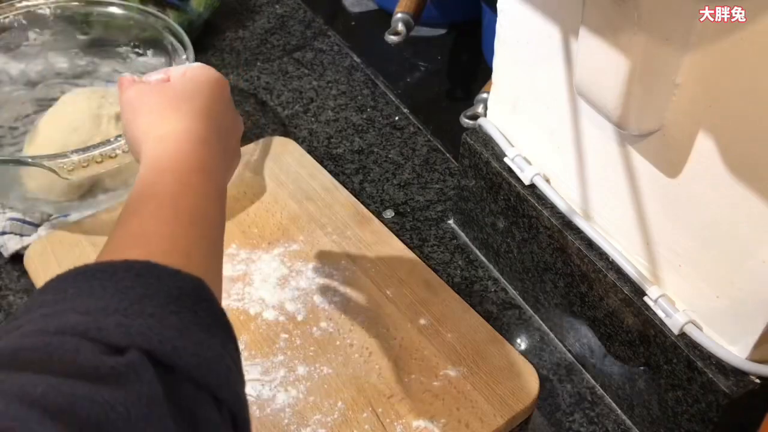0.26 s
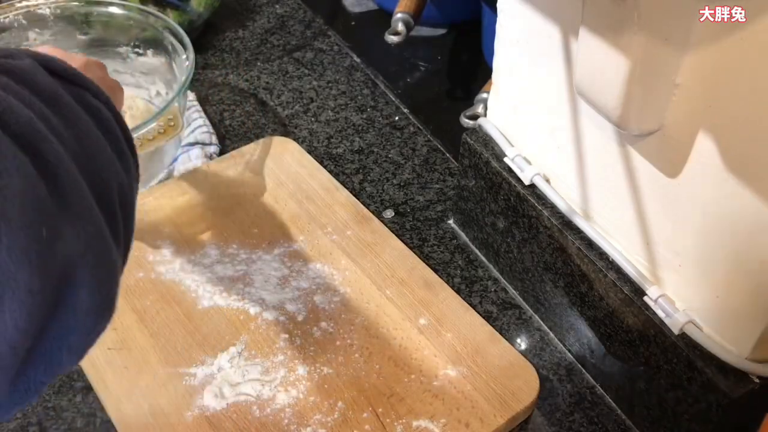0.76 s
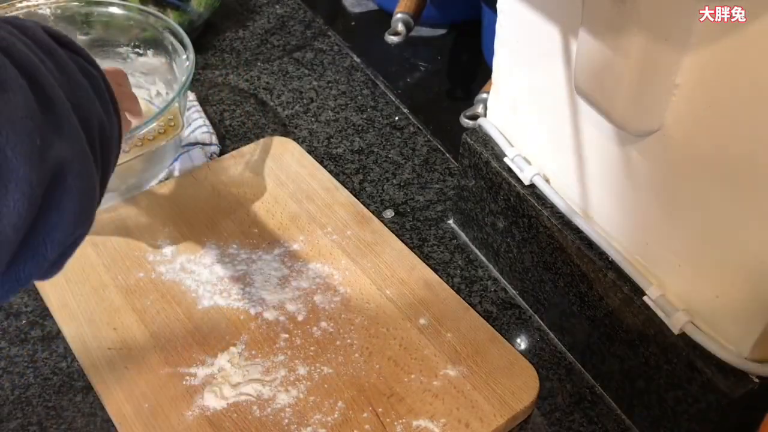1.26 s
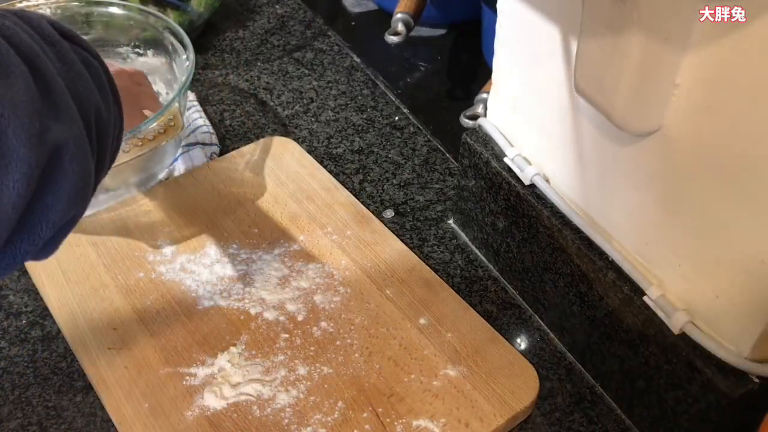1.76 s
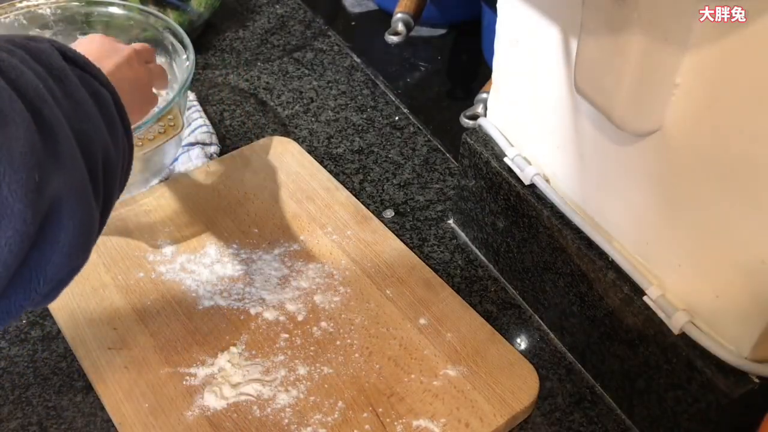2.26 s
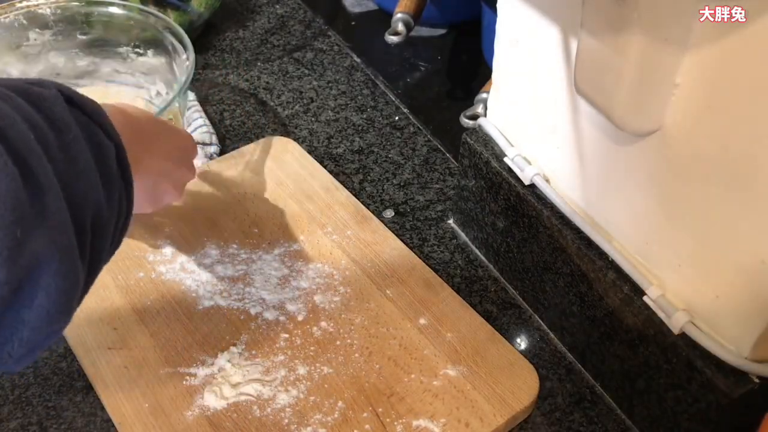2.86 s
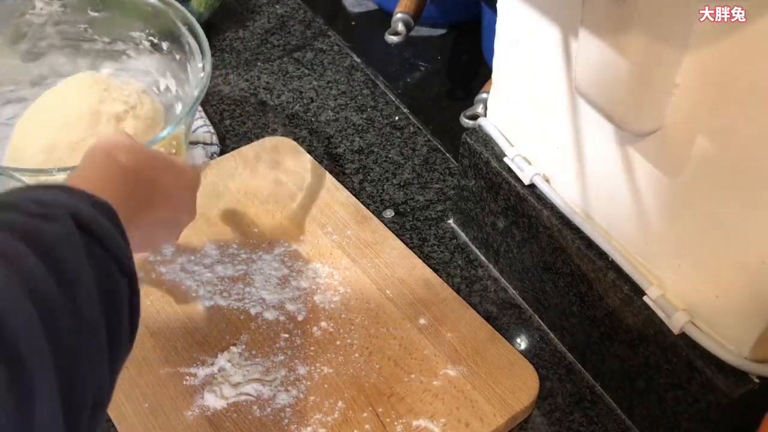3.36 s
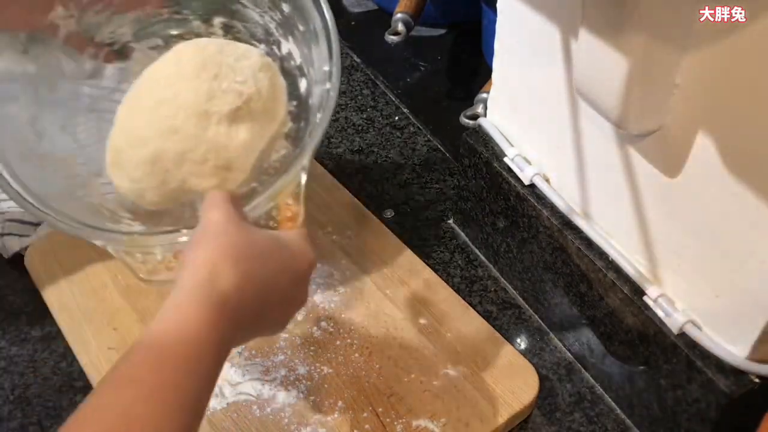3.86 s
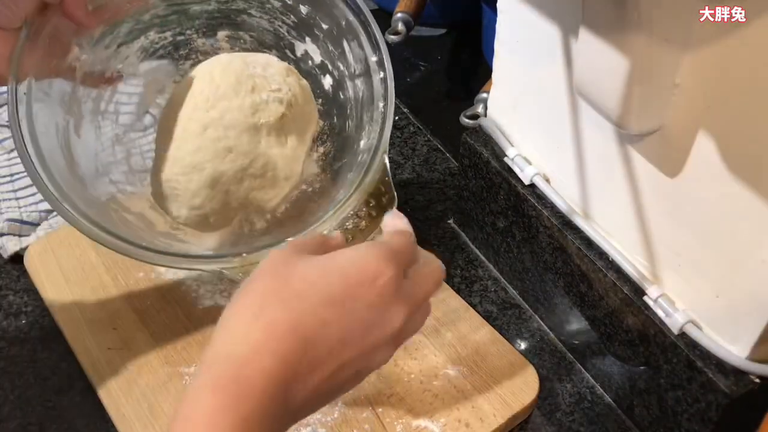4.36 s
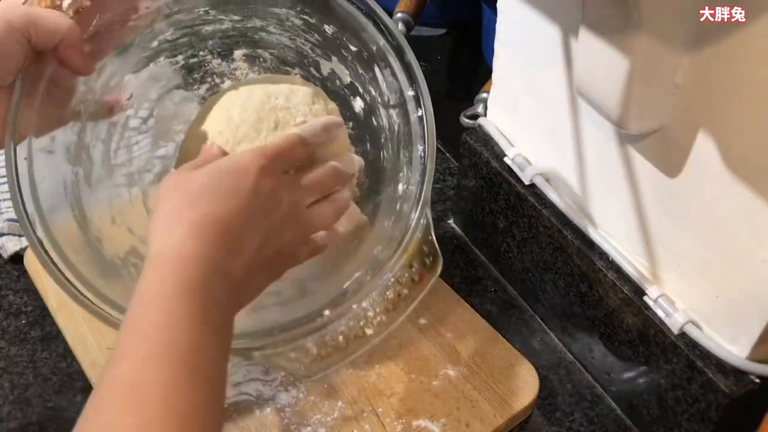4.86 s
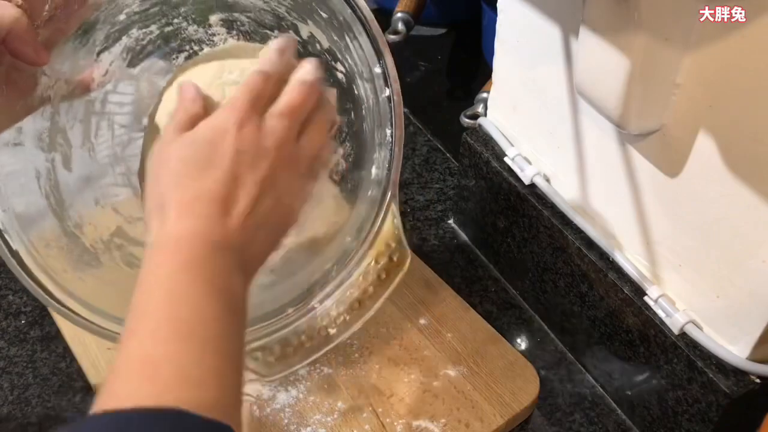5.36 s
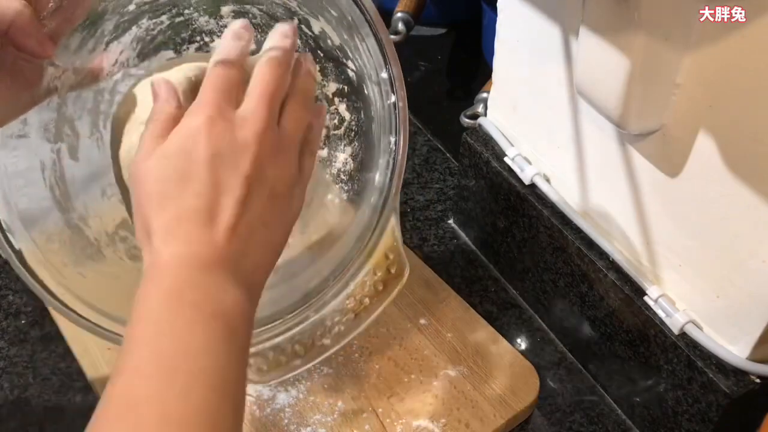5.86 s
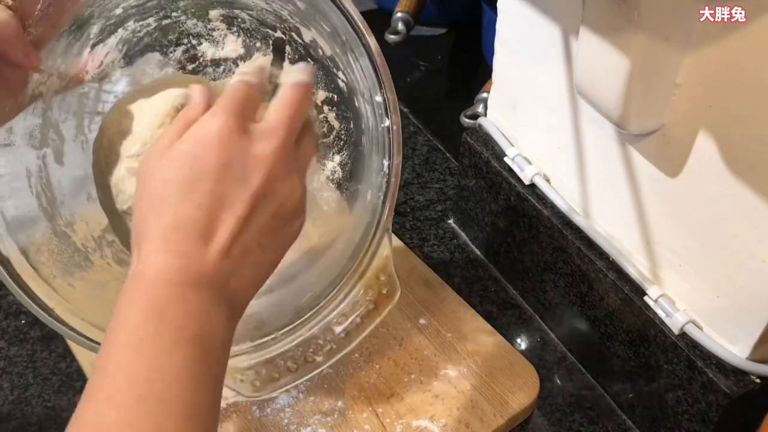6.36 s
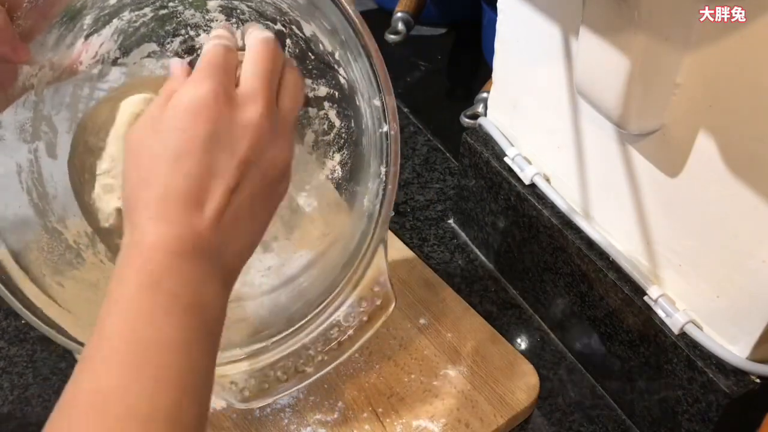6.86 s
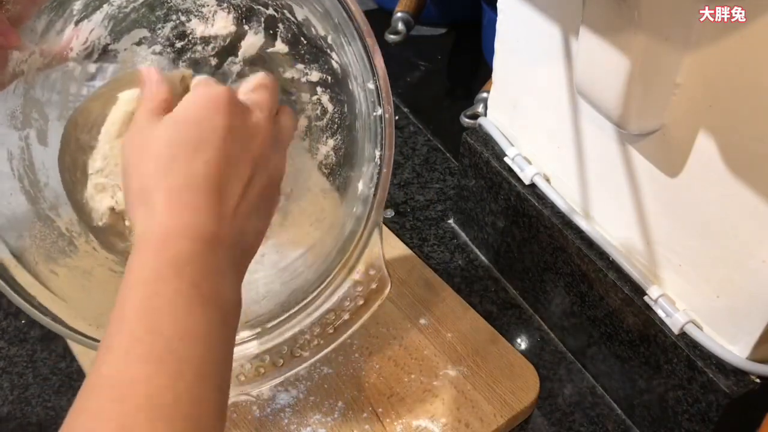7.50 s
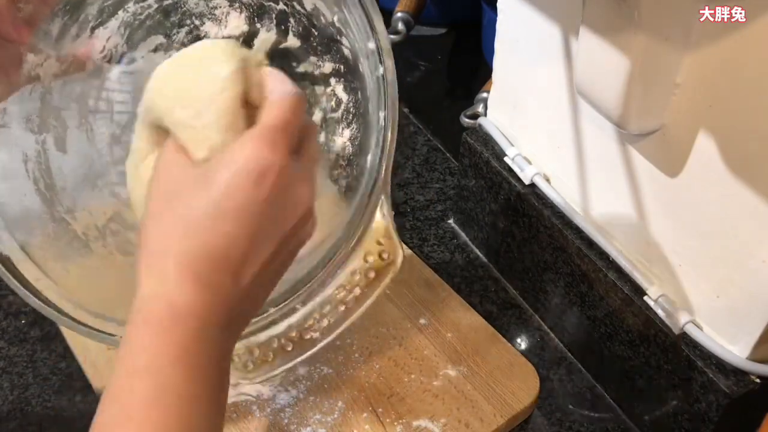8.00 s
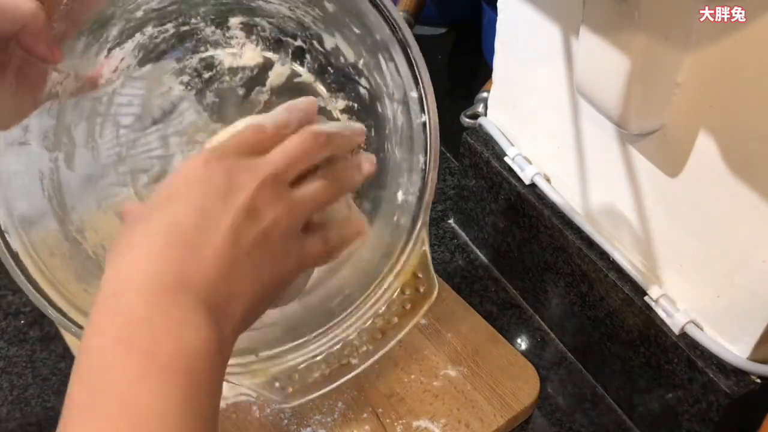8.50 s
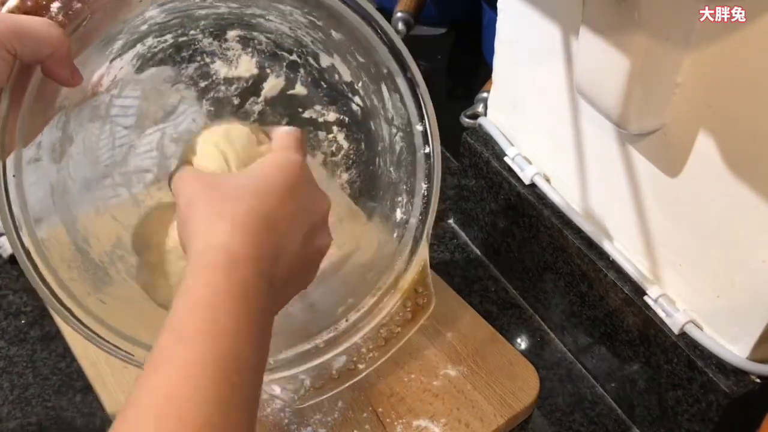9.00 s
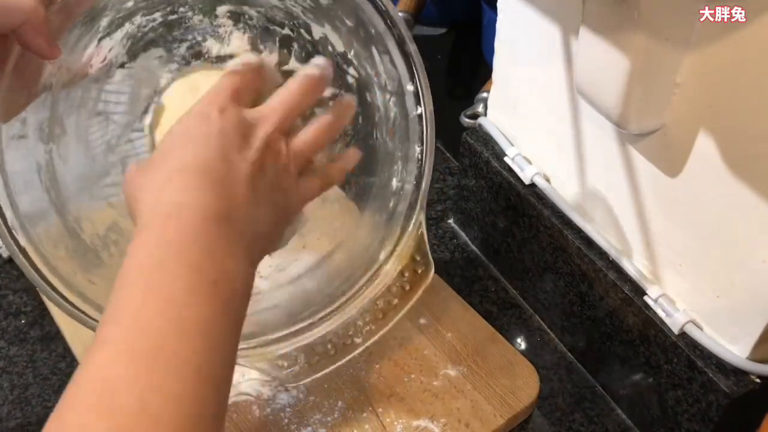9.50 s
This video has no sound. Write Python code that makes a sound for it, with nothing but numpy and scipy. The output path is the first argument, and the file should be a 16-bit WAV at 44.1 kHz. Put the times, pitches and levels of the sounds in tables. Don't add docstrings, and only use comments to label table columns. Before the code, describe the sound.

Small close microphone at a stone counter, steady faint hiss. First soft fizzing friction and tiny crackles; then a hard glass clank and a lower rattling one, both briefly ringing in a small room. Busier dry rubbing and light taps follow, a crisp loud tick, and finally gentle dough presses, moist smears and squishes, with muted hollow bowl knocks to the end.

```python
import sys
import numpy as np
from scipy import signal
from scipy.fft import rfft, irfft, next_fast_len
from scipy.io import wavfile
from scipy.ndimage import uniform_filter1d, map_coordinates

SR = 44100
rng = np.random.default_rng(int(sys.argv[2]) if len(sys.argv) > 2 else 0)


def wav_out(sig):
    wavfile.write(sys.argv[1], SR, np.round(np.clip(np.atleast_2d(sig).T, -1, 1) * 32767).astype(np.int16))


def boost(x):
    u = np.asarray(x, float) / 20
    return 10 ** u


N = 429534

# (time [s], peak level [dB], pitch [Hz], t60 [s], push level [dB])
KNOCKS = [(2.825, -34, 790, 0.09, -9), (3.972, -31.5, 150, 0.021, -7), (4.045, -31.5, 165, 0.098, -12),
          (4.78, -45, 263, 0.061, -7), (5.293, -26.5, 585, 0.061, -10), (5.671, -40, 620, 0.077, -10),
          (6.901, -28.5, 392, 0.02, -1.5), (7.635, -42, 556, 0.073, -10), (7.705, -33.5, 560, 0.031, -2.5),
          (7.798, -42, 527, 0.046, -6), (8.105, -42, 566, 0.032, -3.5), (8.22, -35.5, 547, 0.05, -15.5),
          (8.306, -45, 614, 0.071, -8), (8.499, -46, 514, 0.049, -8), (8.601, -30, 604, 0.063, -2.5),
          (9.321, -39.5, 616, 0.053, -3), (9.3435, -36.5, 584, 0.033, -13), (9.352, -37.5, 610, .05, -3),
          (9.38, -33, 615, 0.068, -1), (9.443, -44, 290, 0.051, -3)]


def unit(x):
    return x / np.sqrt(np.mean(x ** 2) + 1e-20)


def along(points, hz):
    f, v = np.transpose(points)
    return np.interp(np.log(hz + 1), np.log(f + 1), v)


def wobble(rate_hz):
    knots = rng.standard_normal(int(N * rate_hz / SR) + 4)
    return map_coordinates(knots, [np.arange(N) * rate_hz / SR])


def filtered(x, response):
    m = next_fast_len(len(x) + 8192)
    return irfft(rfft(x, m) * response(np.fft.rfftfreq(m, 1 / SR)), m)[:len(x)]


def coloured(x, spectrum):
    return unit(filtered(x, lambda hz: boost(along(spectrum, hz))))


def peak(hz, centre_hz, width_hz):
    return 1j * hz * width_hz / (centre_hz ** 2 - hz ** 2 + 1j * hz * width_hz)


def add(track, s, sound):
    part = track[round(s * SR):][:len(sound)]
    part += sound[:len(part)]


def hiss():
    # (frequency [Hz], level [dB per Hz])
    noise_spectrum = [(12, -29), (20, 2), (37, -1.5), (86, -6.5), (251, -10.5), (428, -13), (670, -14),
                      (1350, -18.5), (1470, -18.5), (4410, -21), (4790, -20.5), (6350, -20.5),
                      (11100, -21.5), (15800, -23), (16900, -40.5)]
    # (frequency [Hz], level [dB rms])
    whine_hz, whine_db = (10815, -78)
    whine_gain = boost(whine_db + 5.0 + 2.5 * wobble(6.0))
    whine = np.sin(2 * np.pi * whine_hz * np.arange(N) / SR) * whine_gain
    drift = boost(0.5 * wobble(2.164))
    return boost(-55.0) * drift * coloured(rng.standard_normal(N), noise_spectrum) + whine


def kitchen(x):
    # (frequency [Hz], t60 [s])
    room_t60 = [(150, 0.36), (1000, 0.37), (4000, 0.22), (12000, 0.28)]
    hz, t, z = signal.stft(rng.standard_normal(SR // 2), SR, nperseg=256)
    decay = boost(-60 * t / along(room_t60, hz)[:, None])
    tail = signal.istft(z * decay, SR, nperseg=256)[1]
    delayed = np.pad(x, (200, 0))
    return signal.fftconvolve(delayed, tail / np.linalg.norm(tail))[:N]


def bumps():
    # (time [s], level [dB], frequency [Hz], direction [-1..1])
    pushes = [(4.62, -40, 70, 0.82), (5.868, -39.5, 25, 0.99), (8.608, -43.5, 15.3, -0.93),
              (9.361, -44, 27, 1)]
    out, t = np.zeros(N), np.arange(SR // 4) / SR
    for s, db, hz, way in pushes:
        swing = np.sin(2 * np.pi * hz * t) * np.minimum(t * hz * 8, 1)
        add(out, s, way * boost(db - 8.9 * t * hz) * swing)
    return out


def squeaks():
    # (time [s], length [s], level [dB], pitch [Hz], roughness [Hz])
    slides = [(3.035, .04, -60, 760, 15), (5.291, .004, -43, 620, 10), (7.632, .015, -63, 1400, 300),
              (7.696, .008, -60, 2000, 160), (7.705, .016, -55, 1850, 120), (7.705, .01, -57, 2200, 120),
              (8.755, .03, -64, 2100, 90), (8.858, .09, -61, 2120, 70), (8.86, .09, -58, 650, 30),
              (8.945, .055, -64.5, 3540, 22), (8.95, .075, -61, 1975, 22), (9.352, .018, -62, 1950, 40),
              (8.945, .05, -65, 6800, 40)]
    out, t = np.zeros(N), np.arange(SR // 5) / SR
    for s, length_s, db, hz, rough_hz in slides:
        drift, flutter = (unit(uniform_filter1d(v, size=220)) for v in rng.standard_normal((2, len(t))))
        pitch_hz = hz * (1.01 - .3 * t) + 1.3 * rough_hz * drift
        tone = np.sin(2 * np.pi * np.cumsum(pitch_hz) / SR) * boost(1.5 + 4 * flutter)
        envelope = np.sqrt(abs(np.sin(np.pi * np.clip(t / length_s, 0, 1))))
        add(out, s, boost(db) * tone * envelope)
    return out


def taps():
    # (time [s], peak level [dB], pitch [Hz])
    clicks = [(3.517, -40, 1320), (3.74, -40, 1950), (3.777, -44, 1290), (3.884, -33.5, 2700),
              (4.049, -36, 1990), (5.673, -49, 1150), (5.697, -38, 3500), (7.324, -45, 2400),
              (7.638, -45, 1130), (7.708, -44, 1900), (8.308, -52, 1590), (9.325, -51, 1210),
              (9.356, -48, 1120), (9.384, -42, 1300)]
    out, t = np.zeros(N), np.arange(600) / SR
    for s, db, hz in clicks:
        click = filtered(1. * (t == 0), lambda f: peak(f, hz, 0.67 * hz) * peak(f, hz, 1.6 * hz))
        add(out, s + .001, -boost(db) * click / abs(click).max())
    return out


def ticks():
    # (time [s], peak level [dB], pitch [Hz])
    snap_rows = [(0.3611, -40, 9600), (0.5044, -40, 4860), (0.525, -23, 10100), (0.53, -26, 9800),
                 (0.548, -31, 9600), (0.556, -29, 9600), (0.561, -29, 9600),  (0.7714, -36, 4770),
                 (0.9173, -37, 4810), (1.2544, -41, 9500), (1.31, -36, 4790), (1.346, -27.5, 9900),
                 (1.537, -34, 5270), (1.5372, -29, 10800), (3.4735, -38, 4700), (3.8524, -30, 8340),
                 (4.031, -23.5, 8160), (4.031, -21, 13500), (4.0493, -20.5, 5040), (4.134, -26, 7500),
                 (4.138, -31, 8300), (4.8379, -29, 4850), (4.8948, -38, 4910), (4.9398, -8.5, 5330),
                 (4.9456, -28, 5300), (4.9484, -37, 4900), (5.0644, -34, 11900), (5.6062, -38, 5160),
                 (5.6983, -33.5, 4790), (7.202, -43, 5300), (7.3245, -40, 11100), (7.878, -43, 7600),
                 (8.6597, -41, 5120), (9.447, -41, 11000), (9.592, -39, 11500), (9.612, -36, 11000),
                 (9.6344, -41, 4750), (.405, -38, 4830), (.6664, -37, 9800), (.7472, -32, 9600),
                 (.9502, -32, 4600), (1.2456, -39, 9900), (1.3024, -35, 9540), (1.357, -38, 5000),
                 (1.516, -39, 9600), (8.702, -42, 4800), (2.833, -36, 5310), (2.848, -37, 4650),
                 (3.6436, -37, 4670), (4.4578, -38, 5130), (5.0362, -33, 4810), (7.1824, -45, 4880),
                 (8.3078, -42, 7310), (9.347, -42, 8810), (9.4891, -38, 5120), (0.9724, -27, 13600),
                 (8.692, -41, 5000),
                 (2.8253, -42, 9680), (3.3621, -44, 4800), (3.4738, -33, 9500), (3.7502, -36, 4770),
              (3.936, -31, 7400), (4.0939, -37, 4810), (4.1004, -33, 8380), (4.1782, -35, 8590),
              (4.5005, -35, 8710), (4.9031, -34, 4990), (5.1218, -43, 4870), (5.9389, -43, 4760),
              (7.3248, -42, 4820), (8.5974, -43, 4710), (8.6922, -35, 10500), (9.0424, -42, 4890),
              (9.5308, -45, 9150)]
    # (frequency [Hz], width [Hz], level [dB])
    port = [(5120, 720, 13.5), (8160, 1400, 10.5), (12700, 1700, 1)]
    out, t = np.zeros(N), np.arange(600) / SR

    def cavity(f):
        return sum(boost(db) * peak(f, c, w) for c, w, db in port) * peak(f, 11000, 8300)

    for s, db, hz in snap_rows:
        burst = (t == 0) + 0.059 * rng.standard_normal(len(t)) * boost(-60 * t / 0.0032)
        broad = np.clip(0.5 + 0.016 * (db + 7.0), .05, 1)
        snap = filtered(burst, lambda f: cavity(f) * (broad + peak(f, hz, 1500)) + 0.12 * peak(f, 2300, 3000))
        add(out, s + .001, boost(db) * snap / abs(snap).max())
    return out


def knocks():
    out, t = np.zeros(N), np.arange(SR // 5) / SR
    for s, db, hz, t60, push_db in KNOCKS:
        cycle = hz * t * 1.06
        push = boost(push_db) * np.sin(2 * np.pi * cycle) * (cycle < 1)
        ring = .5 * np.sin(2 * np.pi * hz * t) * boost(-60 * t / t60)
        low = 0.054 * np.sin(2 * np.pi * 0.36 * hz * t) * boost(-60 * t / 0.015)
        tail = unit(filtered(rng.standard_normal(len(t)), lambda f: peak(f, hz, 260) * peak(f, hz, 600)))
        puff = 0.12 * tail * boost(-60 * t / 0.068)
        onset = 1 - np.exp(-t / 0.00049)
        add(out, s + 0.00408, boost(db - 2.5) * (push + ring + low + puff) * onset)
    return out


def glass(blows, modes, burst, burst_db, burst_t60, rise_s):
    # (frequency [Hz], level [dB], t60 [s])
    contact = [(760, -4.5, 0.04), (1700, -4, .008), (2393, 0, .008), (2800, 7, .006), (2920, 0.5, 0.034)]
    out, t = np.zeros(N), np.arange(18000) / SR
    hz, level, t60 = np.transpose(modes)[:, :, None]
    t60 = np.minimum(t60, .37)
    split = rng.standard_normal(hz.shape)
    twin_hz = hz + (14 + 0.003 * hz) * (np.sign(split) + .3 * split)
    twin_gain = np.clip(.1 + hz / 7000, 0, .75)
    for bounce, (s, db, ping_db) in enumerate(blows):
        size, phase, twin = rng.standard_normal((3, len(modes), 1))
        pair = np.sin(2 * np.pi * hz * t + 0.5 * phase)
        pair = pair + twin_gain * np.sin(2 * np.pi * twin_hz * t + 3 * twin)
        steps = np.repeat(rng.standard_normal((len(modes), len(t) // 400)), 400, axis=1)
        flutter = unit(uniform_filter1d(steps, size=400))
        wake = 1 - np.exp(-t * hz / 1.5)
        early = 1 + 0.73 * boost(-60 * t / 0.51)
        mode_gain = boost(level + 0.8 * size + 2.8 * flutter - 2 - 60 * t / t60)
        ring = early * np.sum(mode_gain * pair * wake, axis=0)
        ping = sum(boost(g - 60 * t / d) * (1 - np.exp(-t * f / 0.99)) * np.sin(2 * np.pi * f * t)
                   for f, g, d in contact)
        dull = filtered(coloured(rng.standard_normal(len(t)), burst), lambda f: 1 / (1 + (f / 3400) ** 4))
        crack = coloured(rng.standard_normal(len(t)), burst)
        noise = boost(-60 * t / burst_t60) * dull + boost(-5.5 - 6.6 * bounce - 60 * t / 0.12) * crack
        blow = ring + boost(ping_db) * ping + boost(burst_db) * noise
        add(out, s, boost(db) * blow * (1 - np.exp(-t / rise_s)))
    return out


def clinks():
    # (time [s], ring level [dB], contact ping level [dB over ring])
    hits = [
        (2.2987, -20.5, 15.5),
        (2.328, -34, 18.5),
        (2.3555, -32.5, 9),
    ]
    # (frequency [Hz], level [dB], t60 [s])
    rim_modes = [(169, -17, 0.25), (600, -19, .25), (700, -13, 0.22), (736, -13, .25), (778, -4, 0.34),
                 (949, -11, 0.37), (1081, -12, .35), (1010, -13.5, 0.35), (1114, -7.5, 0.45), (1160, -7, 0.3),
                 (1320, -26, .35), (1496, -20, 0.37), (1650, -10, 0.3), (1744, -13.5, .3), (1868, -11, 0.4),
                 (2110, -9, .36), (2143, -8, 0.36), (2175, -5, 0.2466), (2401, -18, 0.19), (2470, -14, 0.14),
                 (2680, -13, .25), (2818, -9.5, 0.2), (2970, -6, 0.36), (2920, -4, 0.36),
                 (3628, -27, .25), (4533, -8.5, .22), (5020, -27, .2), (5525, -20, .32), (6002, -22, .27),
                (6400, -26, .15), (6697, -17, .24), (6900, -19, .18), (7050, -23, .2), (7590, -15, .3),
                (7950, -21, .1), (8629, -27, .2), (9475, -15, .25), (10200, -31, .2), (10680, -27, .25),
                (11300, -31, .2), (11710, -33, .22), (12420, -25, .22), (12730, -31, .2), (13200, -32, .15),
                (14630, -33, .22), (15100, -34, .2), (15640, -30, .25)]
    # (frequency [Hz], level [dB per Hz])
    crack_spectrum = [(85, -54), (145, -9.5), (388, -13), (772, -9), (959, -5.5), (1120, -10), (1950, -7),
                      (2890, -12.5), (3800, -60), (4540, 1.5), (4910, -38), (6860, -25), (16000, -60)]
    return glass(hits, rim_modes, crack_spectrum, burst_db=5.5, burst_t60=0.28, rise_s=0.0005)


def clunks():
    # (time [s], ring level [dB], contact ping level [dB over ring])
    hits = [(2.5905, -29, 0.5), (2.5945, -41.5, 9), (2.605, -35, -12), (2.613, -33, -15),
            (2.621, -35.5, -16), (2.633, -50, -17), (2.644, -56, -14), (2.665, -62, -12), (2.827, -53, -9)]
    # (frequency [Hz], level [dB], t60 [s])
    base = [(171, -5.5, 0.19), (350, -18, 0.18), (431, -6, 0.22), (679, 3.5, 0.13), (810, -1, 0.14),
            (1007, -12, 0.38), (1150, -8, 0.33), (1180, -8, 0.27), (1300, -11, 0.14), (1510, -17, 0.3),
            (1657, -8, 0.25), (1830, -18, 0.55), (2140, -7.5, 0.16), (6010, -21, 0.076), (2961, -19, 0.24),
            (3340, -18.5, 0.13), (4750, -30, 0.24), (6900, -26, .1), (8000, -21, 0.076)]
    # (frequency [Hz], level [dB per Hz])
    thud_spectrum = [(85, -47), (145, -9.5), (543, -17), (672, -12), (953, -12.5), (1160, -9),
                     (1950, -18.5), (2200, -14), (2610, -25), (3050, -23), (15000, -34)]
    return glass(hits, base, thud_spectrum, burst_db=4.5, burst_t60=0.14, rise_s=0.00088)


def swell(rows):
    s, length, db = np.transpose(rows)[:3, :, None]
    u = (np.arange(0, N, 64) / SR - s) / length
    rise_db, fall_db = 42, 50
    return boost(db - np.where(u < 0, rise_db, fall_db) * u ** 2)


def grit(spread_db):
    return rng.standard_normal(N) * boost(spread_db * np.minimum(rng.exponential(size=N), 5))


def strokes():
    # (frequency [Hz], level [dB per Hz])
    rub_spectrum = [(1760, -48.5), (3000, -37), (3440, -26.5), (4010, -14), (4530, 2), (4760, 10.5),
                    (4930, 7), (6010, -2), (7000, -19.5), (9100, -14.5), (15400, -120)]
    fizz_low_spectrum = [(3650, -62), (6200, -14), (6860, -2.5), (8350, 5), (9760, -5.5), (10900, -1),
                         (13500, -9.5), (15100, -2.5), (15800, -8.5)]
    fizz_spectrum = [(3650, -19.5), (6200, -32), (6450, -8.5), (8320, -5.5), (9390, 2), (10400, -2),
                     (12400, -3), (15100, -8), (15800, -11.5)]
    smear_spectrum = [(590, -28), (1000, -5), (1290, -4.5), (3590, -8), (4200, -7), (5460, -41),
                      (9240, -120)]
    squish_spectrum = [(59, -21.5), (100, 0.5), (134, -2), (226, -1), (382, -2), (495, -3), (1300, -12),
                       (1690, -39), (2860, -120)]
    # (peak time [s], length [s], rub [dB], fine fizz [dB over rub])
    sweep_rows = [(.13, 0.13, -60.5, 7.5), (.27, 0.19, -68.5, 8.5), (.42, 0.11, -56, 5),
                  (.53, 0.22, -52, 4.5), (.78, 0.15, -50, 2), (.97, 0.2, -56, 6), (1.07, 0.07, -62, 9),
                  (1.15, 0.14, -58, 6), (1.23, .12, -65, 4.5), (1.31, 0.15, -63.5, 8.5),
                  (1.52, 0.056, -64.5, 7.5), (2.70, 0.13, -65, 5), (2.89, 0.099, -42, 2),
                  (3.03, 0.11, -63.5, 8.5), (3.19, 0.22, -64.5, 8.5), (3.40, 0.15, -55.5, 3),
                  (3.52, 0.24, -50, 3.5), (3.68, 0.14, -50.5, 2.5), (3.84, 0.26, -50, 6),
                  (3.97, 0.26, -47.5, 4.5), (4.12, 0.11, -48, 1.5), (4.2, 0.08, -58.5, 2.5),
                  (4.33, 0.23, -66.5, 0), (4.52, 0.075, -53, 3), (4.63, 0.29, -44, 3.5),
                  (4.75, 0.11, -51.5, 1.5), (4.84, 0.069, -52.5, 3), (4.92, 0.07, -45, 2),
                  (5.04, 0.16, -57.5, 1.5)]
    # (peak time [s], length [s], rub [dB], wet smear [dB over rub])
    knead_rows = [(5.30, .06, -65.5, -4), (5.335, .04, -63.5, -14), (5.44, 0.16, -65.5, -15),
                  (5.58, 0.16, -66.5, -12), (5.69, 0.066, -62, 1), (5.85, 0.068, -72.5, -5),
                  (5.905, 0.034, -62, -6), (5.95, 0.052, -57, -6), (6.125, 0.052, -65.5, 4),
                  (6.155, 0.067, -59.5, -4), (6.21, 0.055, -78, -6), (6.36, 0.071, -86, -3),
                  (6.55, 0.13, -74, -6), (6.92, 0.082, -67.5, -6), (7.0, 0.07, -65.5, -9),
                  (7.09, 0.096, -65, -4), (7.2, 0.049, -85, -3.5), (7.32, 0.05, -62.5, -1),
                  (7.72, 0.16, -71, 0.5), (7.87, 0.082, -68, -4), (8.21, 0.04, -64, -3),
                  (8.31, 0.024, -67, 4), (8.48, 0.064, -69.5, -2), (8.61, 0.072, -59, -3),
                  (8.70, 0.025, -61, -10), (8.79, 0.11, -59, -4), (8.9, 0.071, -69, 9),
                  (8.97, 0.1, -65.5, -2), (9.07, 0.057, -59.5, -2), (9.15, 0.049, -64.5, -1),
                  (9.36, 0.034, -72.5, -7), (9.46, 0.086, -65, -6), (9.565, 0.096, -59.5, -10.5),
                  (9.615, 0.07, -55, -11), (9.74, 0.05, -62, -10)]
    # (time [s], fizz centre [Hz], load [dB])
    hands = [(0, 8900, -62.5), (.6, 9050, -61), (.95, 9050, -64), (1.6, 9080, -69), (2.9, 9070, -62.5),
             (3.15, 8160, -60), (3.45, 8960, -61), (3.7, 8950, -59.5), (3.87, 8730, -60.5),
             (4.0, 8050, -67), (4.5, 8100, -67), (4.9, 8830, -59), (5.499, 8800, -61), (6.2, 8940, -60.5),
             (7.0, 9000, -56), (8.2, 8870, -63.5), (9.74, 8910, -59.5)]
    t = np.arange(N) / SR

    def total(gains):
        return np.interp(t, t[::64], np.sqrt(np.sum(gains ** 2, axis=0)))

    def last(rows):
        return boost(np.array(rows)[:, -1:])

    slips = boost(1.2 * wobble(60) + 1.4 * wobble(400)) * grit(spread_db=2.5)
    rub, fizz_low, fizz = (coloured(slips, spectrum) * boost(0.5 * wobble(35))
                           for spectrum in (rub_spectrum, fizz_low_spectrum, fizz_spectrum))
    smear = coloured(slips, smear_spectrum)
    squish = coloured(boost(2.5 * wobble(40)) * grit(spread_db=3.0), squish_spectrum)

    sweeps, kneads = swell(sweep_rows), swell(knead_rows)
    hand_s, *columns = np.transpose(hands)
    fizz_hz, load_db = (np.interp(t, hand_s, c) for c in columns)
    high = np.clip((fizz_hz - 8300) / 900, 0, 1)
    rest = boost(-74.5 + 3.0 * wobble(9.8))
    dry, wet = total(sweeps) + rest, total(kneads)
    airy = total(sweeps * last(sweep_rows)) + boost(4.5) * (wet + rest)
    effort = (dry + wet) / boost(-55)
    slap_s, slap_db = 0.019, -27
    slaps = total(swell([(s + 0.01, slap_s, db + slap_db) for s, db, *_ in KNOCKS]))
    smears = boost(load_db - 2.0) * (dry / boost(-55.5)) ** 0.55 + total(kneads * last(knead_rows))
    squishes = boost(load_db - 0.5 + 1.5 * wobble(5.5)) * effort ** 0.59 + slaps

    fizzes = airy * (high * fizz + (1 - high) * fizz_low)
    return (dry + wet) * rub + fizzes + smears * smear + squishes * squish


def scene():
    blows = clinks() + clunks()
    snaps, thumps = ticks() + taps(), knocks()
    room = kitchen(boost(-7.5) * blows + boost(-7.0) * thumps + boost(-32) * snaps)
    return (blows + snaps + thumps + room + strokes() + squeaks() + bumps() + hiss())[None]


def band_limit(x):
    return signal.sosfilt(signal.butter(12, 16890, fs=SR, output="sos"), x)


def record(dry):
    squeezed = dry[0] / (1 + abs(dry[0] / .92) ** 4) ** (1 / 4)
    top_hz = 15870
    mix = filtered(squeezed, lambda hz: hz < top_hz)[None]
    return band_limit(mix)


dry = scene()
out = record(dry)
wav_out(out)
```